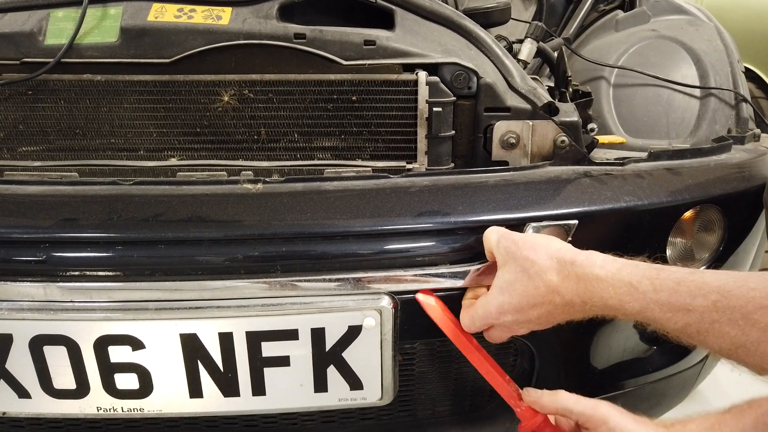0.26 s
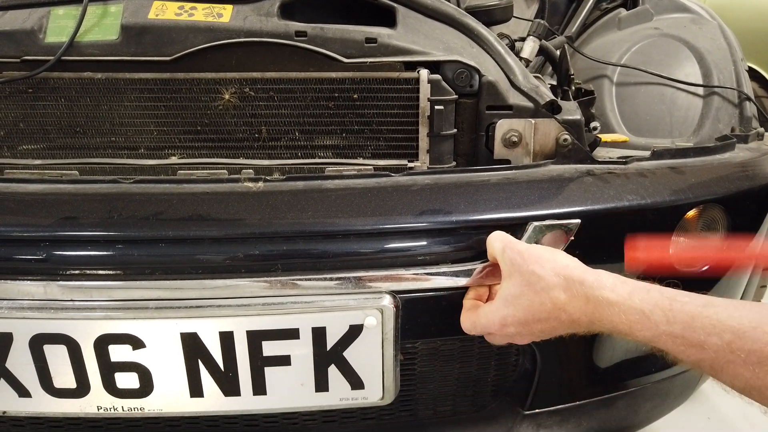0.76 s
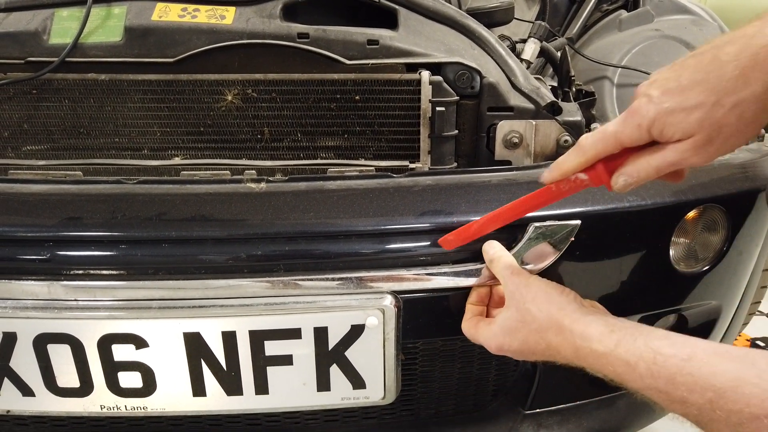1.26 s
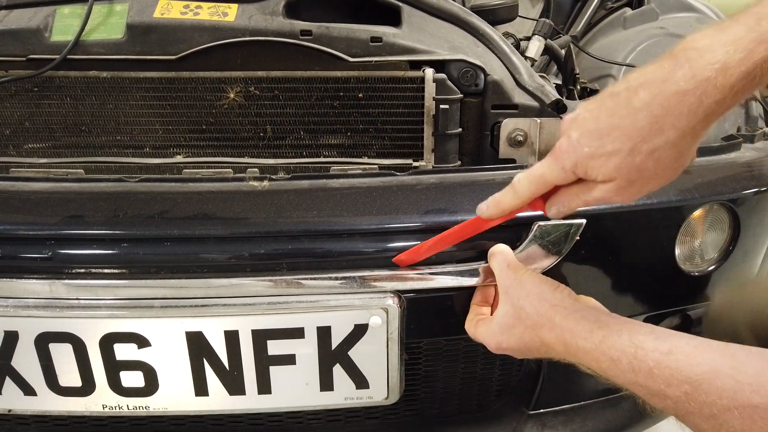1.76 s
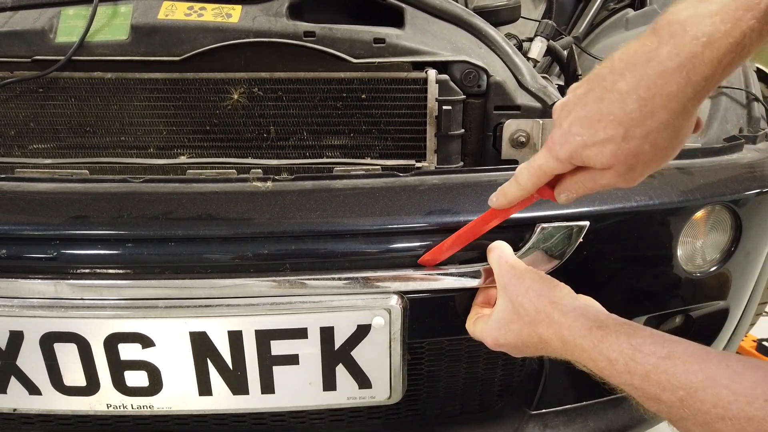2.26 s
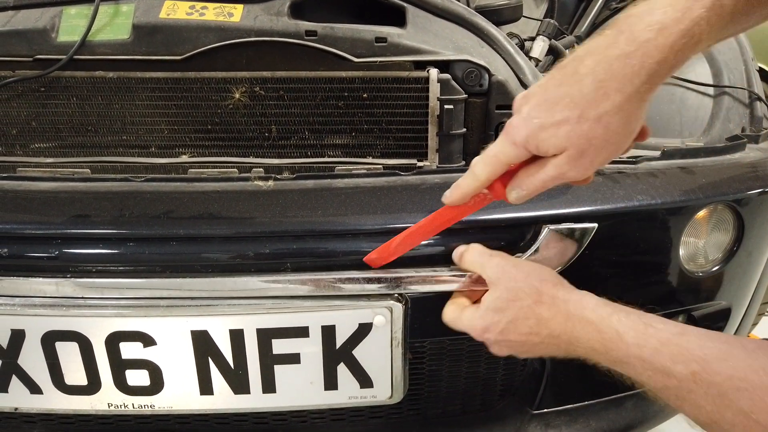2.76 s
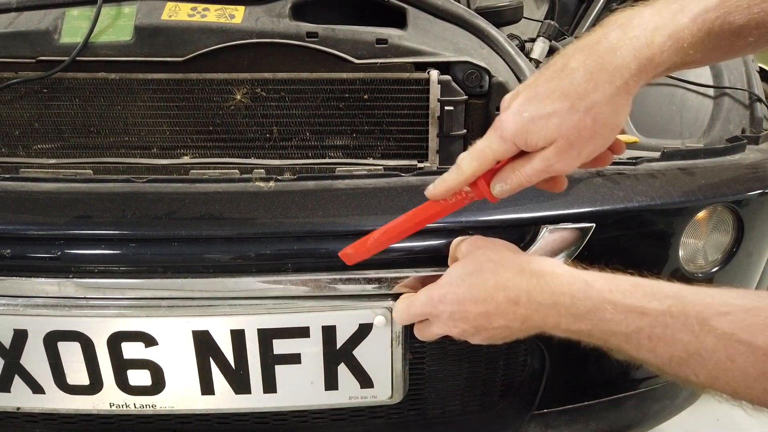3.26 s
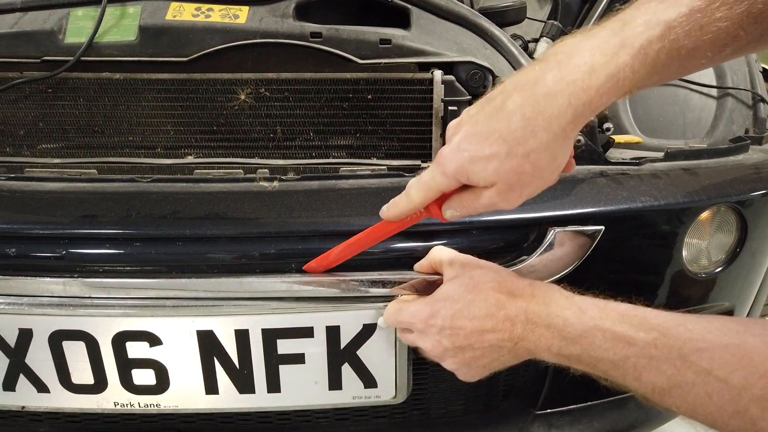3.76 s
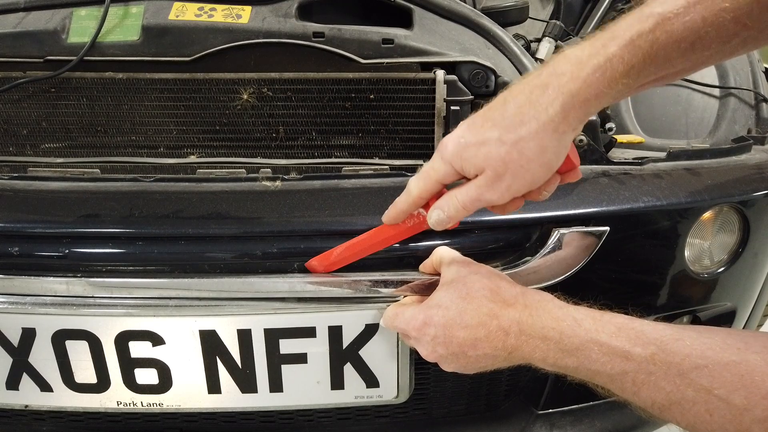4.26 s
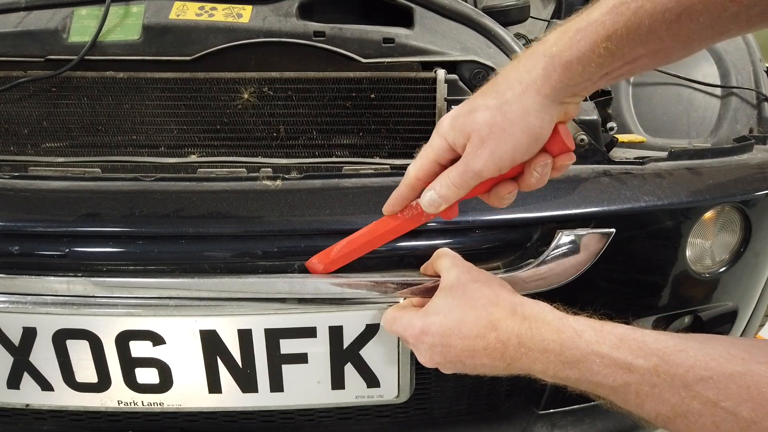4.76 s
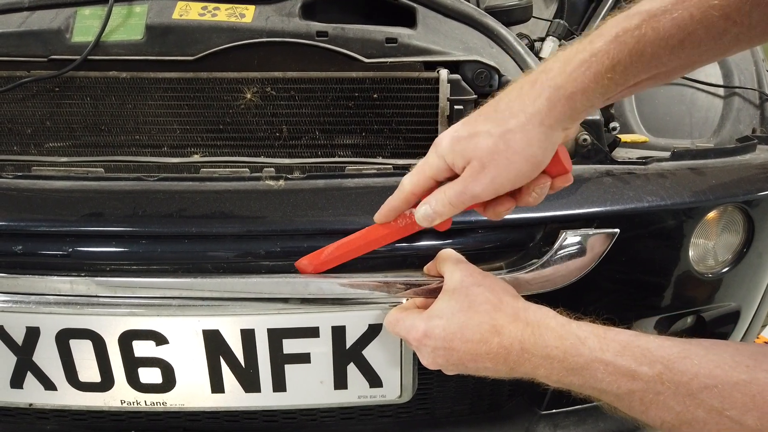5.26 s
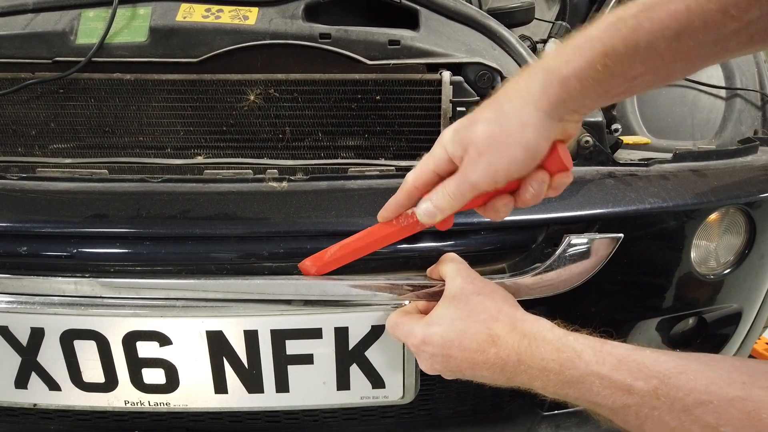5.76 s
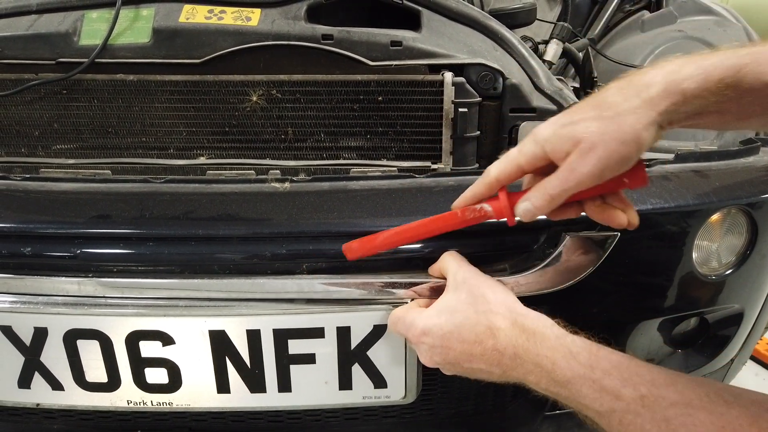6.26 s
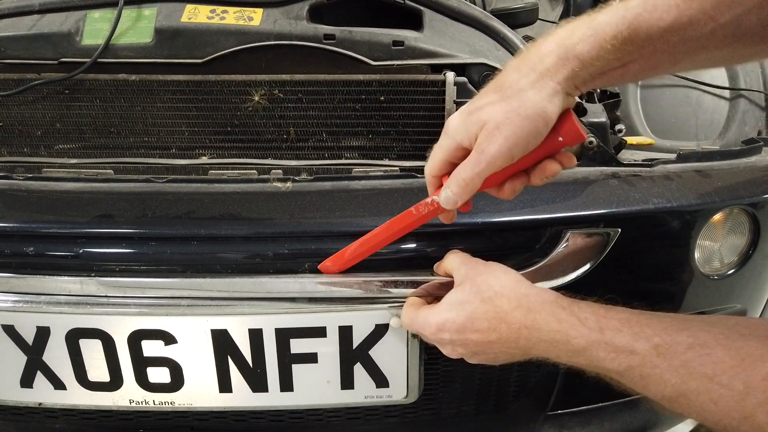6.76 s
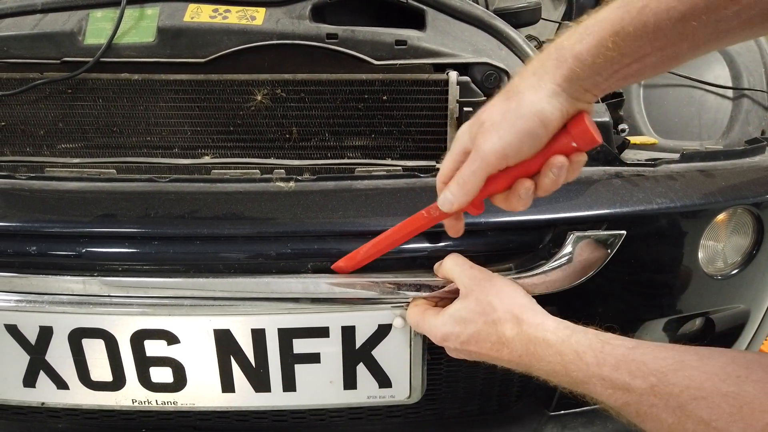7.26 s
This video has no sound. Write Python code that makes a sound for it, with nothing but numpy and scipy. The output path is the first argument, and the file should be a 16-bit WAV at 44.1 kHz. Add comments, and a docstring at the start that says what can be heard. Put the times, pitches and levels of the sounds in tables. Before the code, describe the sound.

Plastic tool work on a car bumper, heard close and central with short, wide room echoes. Dull knocks and gritty rubs lead to one big clip crack that rattles and booms. Dry irregular ticks and a short rising squeak with a groan come next, then a sharp clack, isolated hollow thumps, a rapid knock burst and a final chattering scrape, over soft air and pulsing low rumble.

```python
"""A plastic pry tool rubs, slips and knocks along the trim strip of a car bumper in a garage.
Rubbing is built from random tiny slips; knocks, ticks and the loud snap of a clip shake a hollow panel.
The strained strip rings, squeaks and groans, each by its own vibration, and the garage adds echoes.
A low hum and lumps of filtered-noise rumble swell and fade under it all, with soft, steady air noise."""
import sys
import numpy as np
from scipy import signal
from scipy.fft import rfft, irfft, next_fast_len
from scipy.io import wavfile
from scipy.ndimage import uniform_filter1d

SR = 44100
rng = np.random.default_rng(int(sys.argv[2]) if len(sys.argv) > 2 else 0)


def inscribe(sig):
    """Save sig as 16-bit PCM at rate SR to the path in sys.argv[1].

    A 1-D sig is mono; a 2-D sig holds one channel per row.
    Samples are clipped to [-1, 1] before scaling.
    """
    pcm = np.round(np.clip(np.atleast_2d(sig).T, -1, 1) * 32767)
    wavfile.write(sys.argv[1], SR, pcm.astype(np.int16))


N = 331303   # length in samples, about 7.5 s

# Source levels are set before the mix in scene(). A t60 is the time a sound takes to fall by 60 dB.


def from_db(db):
    """Turn decibels into a gain."""
    return 10 ** (np.asarray(db) / 20)


def rms_one(x):
    """Scale a sound to an rms (average strength) of 1."""
    return x / np.sqrt(np.mean(x ** 2) + 1e-20)


def at_hz(points, hz):
    """Read a table between its rows, on a log-frequency axis."""
    table_hz, values = np.array(points)[:, 0], np.array(points)[:, 1]
    return np.interp(np.log(hz), np.log(table_hz), values)


def cut(x, hz, kind, order=2):
    """Keep only some frequencies, with a Butterworth filter that never looks ahead."""
    return signal.sosfilt(signal.butter(order, hz, kind, fs=SR, output="sos"), x)


def colour(x, spectrum):
    """Shape a sound to a spectrum with a minimum-phase filter, which answers as early as it can."""
    size = 8192
    bin_hz = np.maximum(np.arange(size // 2 + 1) * SR / size, 1)
    cepstrum = irfft(np.log(from_db(at_hz(spectrum, bin_hz))))
    # folding the cepstrum onto its first half makes the filter minimum-phase
    cepstrum[1:size // 2] *= 2
    cepstrum[size // 2 + 1:] = 0
    response = irfft(np.exp(rfft(cepstrum)))
    return signal.fftconvolve(x, response)[:len(x)]


def resonate(x, modes):
    """Let a sound shake several resonances side by side, with alternating signs."""
    out = 0
    for k, (hz, width_hz, db) in enumerate(modes):
        r = np.exp(-np.pi * width_hz / SR)
        feed = (1 - r * r) / 2 * np.array([1, 0, -1])
        feedback = [1, -2 * r * np.cos(2 * np.pi * hz / SR), r * r]
        ringing = signal.lfilter(feed, feedback, x + 1e-18)
        out = out + (-1) ** k * from_db(db) * ringing
    return out


def grains(size, per_s, uneven_db):
    """Tiny slips at random moments and of uneven sizes; rms 1."""
    sizes = from_db(uneven_db * np.minimum(rng.exponential(1, size), 4))
    signs = rng.choice([-1, 1], size)
    happens = rng.random(size) < per_s / SR
    return rms_one(sizes * signs * happens)


def even(x, width_hz):
    """Level the chance peaks and holes in a dying burst's spectrum, so that it has no pitch of its own."""
    size = 2 * x.shape[-1]
    spectrum = rfft(x, size)
    power = np.abs(spectrum) ** 2
    bins = max(int(width_hz * size / SR), 1)
    near, wide = uniform_filter1d(power, bins), uniform_filter1d(power, 20 * bins)
    levelling = np.sqrt(np.abs(wide) / (np.abs(near) + 1e-12))
    return irfft(spectrum * levelling)[..., :x.shape[-1]]


def swell(s, rise_s, fall_s, shape):
    """A gain that peaks at 1 and is 20 dB down one rise earlier and one fall later."""
    away = np.linspace(-1, 1, 161) * 8
    moments = s + away * np.where(away < 0, rise_s, fall_s)
    gains = from_db(-20 * np.abs(away) ** np.clip(shape, .5, 2))
    return np.interp(np.arange(N) / SR, moments, gains)


def add(track, s, sound):
    """Lay a sound into a track at a time."""
    start = round(s * SR)
    track[start:start + len(sound)] += sound[:N - start]


# how alike left and right are: f/Hz, likeness (0 = unrelated, 1 = the same)
LIKENESS = [(100, 0.98), (250, 0.98), (500, 0.86), (1000, 0.82), (2000, 0.27), (4000, 0.07), (9000, 0.16)]


def spread(mid, side):
    """Two unrelated sounds make a stereo field that is alike in the bass and wide in the treble."""
    size = next_fast_len(len(mid))
    bin_hz = np.maximum(np.arange(size // 2 + 1) * SR / size, 1)
    alike = np.clip(at_hz(LIKENESS, bin_hz), -1, 1)
    shared = rfft(mid, size) * np.sqrt(1 + alike)
    opposed = rfft(side, size) * np.sqrt(1 - alike) * [[1], [-1]]
    return irfft(shared + opposed, size)[:, :len(mid)] / np.sqrt(2)


# strokes of the blade along the panel: peak t/s, rise t/s, fall t/s,
# drag level/dB, rasp level/dB, hiss level/dB
STROKES = [(0.15, 0.42, 0.44, -86, -78, -81), (0.425, 0.054, .11, -50, -57.5, -65.5),
           (0.55, .05, 0.056, -54.5, -65, -85), (0.62, .06, 0.13, -60, -70, -86),
           (0.73, 0.2, 0.21, -70, -62.5, -65.5), (1.15, 0.58, .3, -77, -83, -80.5),
                      (1.5, 0.23, 0.43, -65.5, -55, -65.5), (1.665, 0.1, 0.1, -49.5, -46, -43.5),
           (1.83, 0.31, 0.087, -54, -54.5, -57.5), (2.04, 0.3, 0.33, -56.5, -61, -64),
           (2.39, 0.15, 0.6, -67.5, -67.5, -62), (2.94, 0.22, 0.11, -64.5, -68, -69.5),
           (3.14, 0.11, 0.12, -68.5, -84, -75.5), (3.37, 0.42, 0.3, -64.5, -71.5, -80),
           (3.589, 0.18, 0.12, -51.5, -56, -53), (3.98, 0.33, 0.32, -64, -69, -83),
           (4.431, 0.12, .28, -59.5, -72, -83), (5.215, 0.054, 0.056, -51, -64, -65.5),
           (5.99, 0.11, 0.17, -71, -75, -72), (6.619, 0.12, 0.37, -52.5, -60, -67),
           (6.87, 0.15, 0.13, -60, -64, -59.5), (7.01, 0.26, 1, -54.5, -63, -67),
           (7.39, 0.12, 0.084, -53, -62, -63)]
# resonances of the hollow bumper, also used by blow(): f/Hz, width f/Hz, level/dB
PANEL = [(231, 5.3, -4), (307.7, 32, 2.5), (471, 16, -4.5), (542.5, 23, 2.5), (630, 53, 0), (721.5, 39, 4),
         (875, 46, -14.5), (1083, 17, 0.5), (1212, 65, -6.5), (1312, 16, 2.5), (1486, 120, -5),
         (1650, 93, 4.5), (1862, 150, -2.5), (2038, 70, 5), (2606, 60, -10.5), (3030, 89, 0.5),
         (3210, 76, -10.5)]
# sound colour of the coarse, fine and finest slips: f/Hz, relative level/dB
DRAG = [(120, -4), (280, 3), (430, -5), (620, -4), (1000, -3.5), (1800, -9.5), (2400, -13.5), (4000, -49)]
RASP = [(1400, -23.5), (2100, -2.5), (2700, -2.5), (3250, -1), (3900, -14), (6000, -48.5)]
HISS = [(2800, -17.5), (3900, 2.5), (6000, 2), (9000, -2), (11500, 1), (13500, -5), (16000, -6.5)]
RESTING_DB = (-82, -91.5, -92)   # drag, rasp and hiss of the blade resting on the panel
STROKE_SHAPE = 1.33   # 1 = pointed, 2 = rounded


def rubbing():
    """Coarse slips drag on the panel, finer ones rasp on the blade's edge, the finest hiss, in strokes."""
    swells = np.array([swell(s, rise_s, fall_s, STROKE_SHAPE) for s, rise_s, fall_s, *_ in STROKES])
    peaks = from_db([levels_db for _, _, _, *levels_db in STROKES])
    # resting sound and overlapping strokes add up as power
    resting = from_db(RESTING_DB)[:, None]
    drag, rasp, hiss = np.sqrt(resting ** 2 + peaks.T ** 2 @ swells ** 2)
    coarse = colour(grains(N, 1600, 6.64), DRAG)
    coarse = rms_one(coarse + from_db(5) * resonate(coarse, PANEL))
    fine = rms_one(colour(grains(N, 5000, 5.8), RASP))
    finest = rms_one(colour(grains(N, 17000, 1.5), HISS))
    return drag * coarse + rasp * fine + hiss * finest


# the hum swells and fades: start t/s, end t/s, top level/dB
HUM_SWELLS = [(0.103, 1.3, -44.5), (1.462, 2.6, -44.5), (2.746, 3.9, -51.5), (4.2, 5.25, -51),
              (5.5, 6.5, -46.5), (6.682, 7.58, -43)]
# the hum sinks a little: t/s, f/Hz
HUM_HZ = [(0.0, 54.5), (2.3, 54.3), (2.7, 53.04), (7.51, 53)]
# lumps of low rumble: peak t/s, half length t/s, level/dB
LUMPS = [(1.183, 0.25, -50.5), (1.685, 0.098, -33), (1.97, 0.18, -44.5), (2.257, 0.14, -35),
         (2.47, 0.043, -45), (2.77, 0.16, -44.5), (3.366, 0.15, -44.5), (3.99, 0.26, -47),
         (4.505, 0.14, -40.5), (5.137, 0.2, -45), (5.76, 0.19, -49), (6.294, .19, -41), (6.83, 0.16, -39),
         (7.358, 0.19, -42.5)]
# sound colour of the rumble: f/Hz, relative level/dB
RUMBLE = [(12, -14), (22, -5.5), (32, 1), (42, -10.5), (60, -21.5), (90, -15), (140, -31), (260, -36.5),
          (600, -72.5)]
# sound colour of the still air: f/Hz, relative level/dB
AIR = [(35, -32.5), (60, 1), (113, -4), (184, -27), (515, -27.5), (698, -26), (1380, -35.5), (2710, -36),
       (4640, -45.5), (11300, -48), (16000, -83.5)]
HUM_LOWEST_DB, RUMBLE_FLOOR_DB, AIR_DB = -64, -59, -61
HUM_SHAPE, LUMP_SHAPE = 0.97, 1.8   # power of the hum's arches; roundness of the lumps


def background():
    """A sine hum swells in arches; filtered noise makes lumps of low rumble and the sound of still air."""
    t = np.arange(N) / SR
    hum = from_db(HUM_LOWEST_DB)
    for start, end, db in HUM_SWELLS:
        arch = np.abs(np.sin(np.pi * np.clip((t - start) / (end - start), 0, 1)))
        hum = np.maximum(hum, from_db(db) * arch ** HUM_SHAPE)
    rumble = from_db(RUMBLE_FLOOR_DB)
    for s, half_s, db in LUMPS:
        rumble = np.maximum(rumble, from_db(db) * swell(s, half_s, half_s, LUMP_SHAPE))
    hum_hz = np.interp(t, *np.transpose(HUM_HZ))
    tone = np.sqrt(2) * np.sin(2 * np.pi * np.cumsum(hum_hz) / SR)
    lumps = colour(rng.standard_normal(N), RUMBLE)
    # even out the noise's own ups and downs, so the table sets the level
    lumps = lumps / np.sqrt(uniform_filter1d(lumps ** 2, size=6000))
    air = spread(*[rms_one(colour(white, AIR)) for white in rng.standard_normal((2, N))])
    return hum * tone + rumble * lumps + from_db(AIR_DB) * air


# the loose strip rings: t/s, f/Hz, starting level/dB, t60 t/s
PINGS = [(0.27, 255, -27, 0.068), (1.525, 656, -35.5, 0.09), (5.426, 1130, -41, 0.034),
         (6.020, 1860, -34.5, 0.046), (6.023, 3250, -44, 0.034), (6.021, 699, -51, 0.13),
         (6.024, 1700, -71, 0.3), (6.436, 675, -25.5, 0.064), (6.468, 690, -30.5, 0.055),
         (6.467, 1950, -33.5, 0.074), (6.465, 5900, -34.5, 0.0096), (6.466, 5230, -32.5, 0.016)]


def pings():
    """Some blows leave the strip ringing: each note is a sine wave that dies away."""
    out, t = np.zeros(N), np.arange(SR) / SR
    for s, hz, db, t60 in PINGS:
        add(out, s, from_db(db - 60 * t / t60) * np.sin(2 * np.pi * hz * t))
    return out


# basic sound colour of a blow: f/Hz, relative level/dB (per Hz)
BLOW = [(120, 9), (260, 9), (400, 0), (650, 0.5), (1500, -2), (3200, -3.5), (4000, -12.5), (6000, -15.5),
        (11000, -16.5), (15500, -27)]
BLOW_EDGES = [450, 1000, 3500]   # borders between thud, body, clack and crack, in Hz


def blow(levels_db, t60, lift_db, sharp_db, modes_db):
    """A sharp contact and a dying chatter shake the panel; four registers get their own weights."""
    t = np.arange(SR // 2 if t60 > .2 else SR // 5) / SR
    dying = from_db(-60 * t / max(t60, .01))
    contact = from_db(sharp_db - 60 * t / 0.008)
    chatter = grains(len(t), 9000, 3.2) * (dying + contact)
    shake = colour(even(chatter, width_hz=45), BLOW)
    shake = shake + from_db(modes_db) * resonate(shake, PANEL)
    low, middle, high = BLOW_EDGES
    clack = cut(shake, [middle, high], "band", order=5)
    thud = cut(shake, [150, low], "band", order=3)
    body = cut(shake, [low, middle], "band", order=3)
    crack = cut(shake, high, "high", order=5)
    crack = colour(crack, [(6000, 0.032), (14000, 2 * lift_db)])   # a harder contact reaches higher
    out = 0
    for db, x in zip(levels_db, [clack, thud, body, crack]):
        loudest = np.sqrt(uniform_filter1d(x * x, size=441).max())   # strongest 10 ms
        out = out + from_db(db) * x / loudest
    return out


# hollow knocks on the bumper: t/s, clack level/dB, thud level/dB, crack level/dB, ring t60 t/s
KNOCKS = [(0.2717, -46.5, -41, -72, 0.078), (0.3952, -53.5, -50.5, -64, 0.1),
          (0.5342, -55.5, -58, -69, .08), (0.553, -57, -61, -72, .07), (1.522, -46, -44.5, -50, .12),
          (1.7007, -43, -45.5, -45, 0.021), (1.935, -52, -46.5, -68, 0.085), (2.0499, -58, -53, -71, 0.037),
          (2.388, -56, -54, -71, 0.014), (3.2317, -61, -53, -76, 0.07), (3.7072, -55.5, -50, -68.5, 0.049),
          (3.925, -57.5, -52.5, -68, .036), (4.3849, -33.5, -43.5, -35, 0.032), (4.964, -73, -70, -86, .04),
          (5.2285, -43, -39.5, -60, 0.036), (5.6359, -62.5, -69, -85.5, .03), (5.928, -71, -60, -75, .04),
          (5.9838, -72, -63, -68.5, 0.11), (6.021, -62, -54.5, -57.5, 0.12), (6.4341, -40, -37, -51, 0.13),
          (6.466, -37.5, -52, -39, 0.043), (6.4823, -37.5, -42, -59, 0.033),
          (6.523, -36.5, -46, -73, 0.059), (7.21, -47, -60, -57, 0.023)]
KNOCK_BODY_DB, KNOCK_LIFT_DB = -0.5, -2   # body against the mean of clack and thud; treble tilt of the crack


def knocks():
    """Blade and strip knock on the hollow bumper; the body lies about midway between thud and clack."""
    out = np.zeros(N)
    for s, clack, thud, crack, t60 in KNOCKS:
        body = (clack + thud) / 2 + KNOCK_BODY_DB
        add(out, s, blow([clack, thud, body, crack], t60, KNOCK_LIFT_DB, sharp_db=5, modes_db=7))
    return out


# clear dry ticks of the strained strip: t/s, clack level/dB, crack level/dB
TICKS = [(0.4595, -52, -75), (1.9688, -49.5, -73), (2.8933, -48, -56), (3.259, -55, -68),
         (3.4335, -54.5, -79), (3.4656, -51, -64), (3.6399, -47.5, -60), (3.849, -45, -55),
         (3.866, -47.5, -61), (3.9807, -58, -75), (4.0302, -53.5, -66), (4.124, -47.5, -54.5),
         (4.2574, -65, -85), (4.4873, -51, -67), (4.6829, -66, -93.5), (5.0913, -67, -83),
         (5.4262, -47.5, -50)]
# resonances of the strip that tint the ticks, the lower one weakened and the upper one lifted:
# f/Hz, width f/Hz, level/dB
TICK_RING = [(1800, 120, -7.5), (3230, 210, -4)]
TICK_THUD_DB, TICK_BODY_DB = -20.5, -11.5   # against the clack
TICK_LIFT_DB, TICK_T60_S = -4, 0.048
STRAIN_S = (3.1, 4.8)   # faint ticks while the strip is bent outwards: from, to
FAINT_TICKS_PER_S, FAINT_TICK_DB, FAINT_SPREAD_DB = 6.3, -70, -1.5
FAINT_CRACK_DB = -33   # against the clack


def ticks():
    """The strained strip ticks and hardly moves the panel; fainter ticks come at uneven, random times."""
    out, (start, end) = np.zeros(N), STRAIN_S
    moments = np.arange(start, end, 1 / FAINT_TICKS_PER_S)
    late, strong = rng.uniform(-1, 1, (len(moments), 2)).T
    faint_s = moments + late / FAINT_TICKS_PER_S / 2
    faint_db = FAINT_TICK_DB + FAINT_SPREAD_DB * strong
    faint = zip(faint_s, faint_db, faint_db + FAINT_CRACK_DB)
    for s, clack, crack in [*TICKS, *faint]:
        levels_db = [clack, clack + TICK_THUD_DB, clack + TICK_BODY_DB, crack]
        add(out, s, blow(levels_db, TICK_T60_S, TICK_LIFT_DB, sharp_db=5.5, modes_db=5))
    # signs alternate in resonate(): this weakens the first resonance and lifts the second
    return out - resonate(out, TICK_RING)


# the blade chafes on one gliding resonance: start t/s, length t/s, centre f/Hz, width f/Hz, level/dB
SCRAPES = [(0.612, .1, 2710, 600, -62), (.738, 0.061, 2333, 700, -65.5), (1.308, 0.12, 2580, 450, -63),
           (1.578, 0.097, 2834, 710, -45), (1.767, 0.091, 1976, 304.3, -53), (2.097, 0.081, 2910, 300, -63),
           (2.306, 0.1, 8600, 700, -68), (2.329, 0.14, 3250, 200, -70.5), (2.336, .065, 11260, 500, -67.5),
           (5.164, .077, 2994, 350, -62.5), (5.235, .07, 292, 220, -53.5), (6.702, 0.052, 2920, 300, -62.5),
           (6.853, 0.22, 1717, 150, -64.5), (6.976, 0.048, 3105, 200, -60.5),
           (7.285, 0.038, 3700, 1100, -49)]
SCRAPE_GLIDE = 0.034   # the pitch rises from this share below the centre to this share above


def scrapes():
    """A short stroke swells and fades; friction shakes a narrow resonance that glides upwards."""
    out = np.zeros(N)
    for s, length_s, hz, width_hz, db in SCRAPES:
        size = int(max(length_s, .01) * SR)
        glide_hz = hz * (1 + SCRAPE_GLIDE * np.linspace(-1, 1, size))
        phase = 2 * np.pi * np.cumsum(glide_hz) / SR
        # slow noise on a sine and a cosine makes a narrow band of noise around the pitch
        shake = cut(rng.standard_normal((2, size)), width_hz / 2, "low")
        band = shake[0] * np.cos(phase) + shake[1] * np.sin(phase)
        stroke = np.sqrt(np.hanning(size)) * band
        add(out, s, from_db(db) * rms_one(stroke))
    return out


# a clip lets go, then the strip rattles in its seat: t/s, clack level/dB, thud level/dB, body level/dB,
# crack level/dB, t60 t/s, first contact level/dB, panel resonance level/dB
SNAP = [(2.5129, -26, -37.5, -32.5, -31, 0.077, 0.5, 1), (2.517, -33, -38.5, -36, -36, 0.37, -6, 5.5)]
SNAP_LIFT_DB = -1   # treble tilt of the crack
BOOM_DB, BOOM_T60_S, BOOM_RISE_S = -34, 0.46, .003


def snap():
    out, t = np.zeros(N), np.arange(SR) / SR
    for s, *levels_db, t60, sharp_db, modes_db in SNAP:
        add(out, s, blow(levels_db, t60, SNAP_LIFT_DB, sharp_db, modes_db))
    boom = rms_one(cut(rng.standard_normal(SR), [60, 240], "band"))
    dying = from_db(BOOM_DB - 60 * t / BOOM_T60_S)
    rising = 1 - np.exp(-t / BOOM_RISE_S)
    add(out, SNAP[0][0], dying * rising * boom)
    return out


# the strip squeaks under the blade: start t/s, length t/s, first f/Hz, last f/Hz, level/dB
SQUEAKS = [(3.471, 0.055, 1104, 1367, -54), (3.495, 0.15, 1480, 1584, -58.5),
           (3.565, 0.078, 1597, 1750, -55.5)]


def squeaks():
    """Fast stick-slip sings on a rising, unsteady note."""
    out = np.zeros(N)
    for s, length_s, first_hz, last_hz, db in SQUEAKS:
        size = int(max(length_s, .01) * SR)
        waver = rms_one(cut(rng.standard_normal(size), 150, "low"))
        note_hz = np.linspace(first_hz, last_hz, size) * (1 + 0.014 * waver)
        phase = 2 * np.pi * np.cumsum(note_hz) / SR
        add(out, s, from_db(db) * np.sqrt(np.hanning(size)) * np.sin(phase))
    return out


# the strip judders against the panel: t/s, slip rate f/Hz, level/dB
GROAN = [(3.519, 76, -54), (3.581, 116, -57.5), (3.65, 105, -51.5), (3.70, 126, -50), (3.731, 112, -59),
         (3.759, 110, -85)]
# sound colour of the groan: f/Hz, relative level/dB
GROAN_BODY = [(50, -22), (110, 3), (220, -12.5), (330, -3), (450, -39), (700, -16), (1500, -27),
              (3000, -43)]


def groan():
    """Slow, almost regular stick-slip makes the panel groan: one jerk for each slip."""
    s, per_s, db = np.transpose(GROAN)
    t = np.arange(N) / SR
    waver = rms_one(cut(rng.standard_normal(N), 36, "low"))
    rate = np.interp(t, s, per_s) * (1 + 0.0187 * waver)
    slips_so_far = np.floor(np.cumsum(rate) / SR)
    jerks = rms_one(colour(np.diff(slips_so_far, prepend=0), GROAN_BODY))
    sounding = (t > s[0]) * (t < s[-1])
    return jerks * from_db(np.interp(t, s, db)) * sounding


# the blade sticks and slips in short dying runs: start t/s, first peak level/dB (before scatter)
SLIP_RUNS = [(7.1646, -36), (7.268, -26.5), (7.3032, -36), (7.386, -42)]
# resonances of the blade: f/Hz, width f/Hz, relative level/dB
BLADE = [(1600, 770, -2.5), (2770, 130, 7.5), (3260, 170, 1.5), (3900, 1330, -10.5), (5400, 560, -9.5)]
SLIP_GAP_S, SLIP_JITTER = .0058, .25   # mean gap; largest change of a gap, as a share
SLIP_LOSS_DB, SLIP_SPREAD_DB = 2.2, 4.5   # loss and scatter from slip to slip


def slips(count=5):
    """Each jerk rings the blade for a few milliseconds; the jerks come unevenly and tend to weaken."""
    out = np.zeros(N)
    tick = resonate(signal.unit_impulse(SR // 20), BLADE)
    tick = tick / np.abs(tick).max()
    for s, db in SLIP_RUNS:
        for k, (late, strong) in enumerate(rng.uniform(-1, 1, (count, 2))):
            slip_db = db - SLIP_LOSS_DB * k + SLIP_SPREAD_DB * strong
            add(out, s, from_db(slip_db) * tick)
            s += SLIP_GAP_S * (1 + SLIP_JITTER * late)
    return out


# how long the garage rings: f/Hz, t60 t/s
GARAGE = [(100, 0.3), (500, 0.6), (2500, 0.62), (6000, 0.43), (14000, 0.25)]


def garage(x, wet_db, treble_db, early_db):
    """A diffuse noise tail, soonest gone in the top treble; echoes change as hands and tool move."""
    t, edges = np.arange(SR) / SR, np.geomspace(70, 17000, 9)
    out, places = 0, 5
    for place in range(places):
        tails = 0
        for low, high in zip(edges, edges[1:]):
            hz = np.sqrt(low * high)
            late = from_db(-60 * t / at_hz(GARAGE, hz))
            early = from_db(early_db - 60 * t / 0.1)   # near walls answer first
            gain = from_db(wet_db + treble_db * hz / (hz + 3000))
            noise = cut(rng.standard_normal((2, SR)), [low, high], "band")
            tails = tails + gain * (late + early) * noise
        tails = tails * (t > .003) / np.sqrt(SR / 20)
        # fade from place to place, seven steps a second, round and round
        away = (np.arange(N) / SR * 7 - place) % places - places / 2
        here = np.sqrt(np.maximum(1 - np.abs(away), 0))
        echo = spread(*even(tails, width_hz=12))
        out = out + signal.fftconvolve((x * here)[None], echo, axes=1)[:, :N]
    return out


def scene():
    """The work is straight ahead, its treble partly shaded; the room answers from all sides."""
    rub = rubbing() + scrapes()
    hits = pings() + knocks() + ticks()
    crack = snap()
    creaks = squeaks() + groan() + slips()
    near = hits + crack + creaks + from_db(-2.5) * rub
    to_room = hits + from_db(8.5) * crack + from_db(4.5) * rub + from_db(3) * creaks
    direct = colour(near, [(3000, -0.5), (5000, -6.5), (9000, -8.5)])
    return direct + garage(to_room, wet_db=-12.0, treble_db=5.5, early_db=10.5) + background()


CUTOFF_HZ = 15900


def record(dry):
    """The top is cut steeply by an elliptic low-pass filter."""
    return signal.sosfilt(signal.ellip(10, .2, 80, CUTOFF_HZ, fs=SR, output="sos"), dry)


dry = scene()
out = record(dry)
inscribe(out)
```